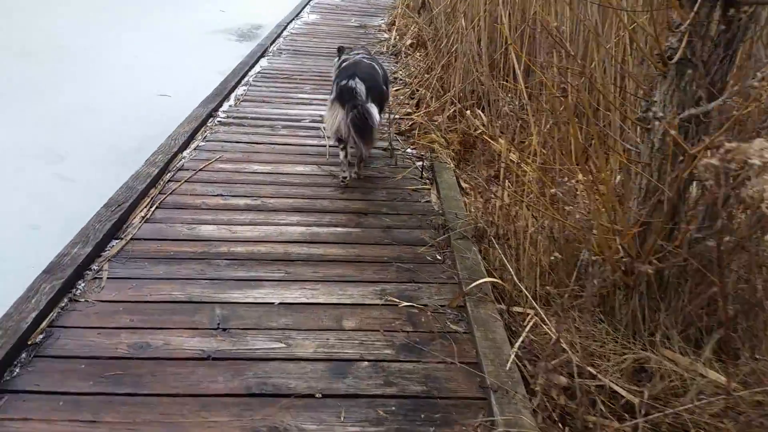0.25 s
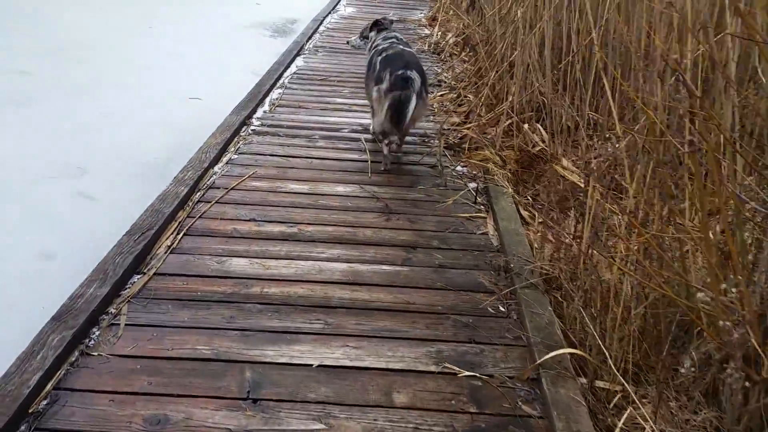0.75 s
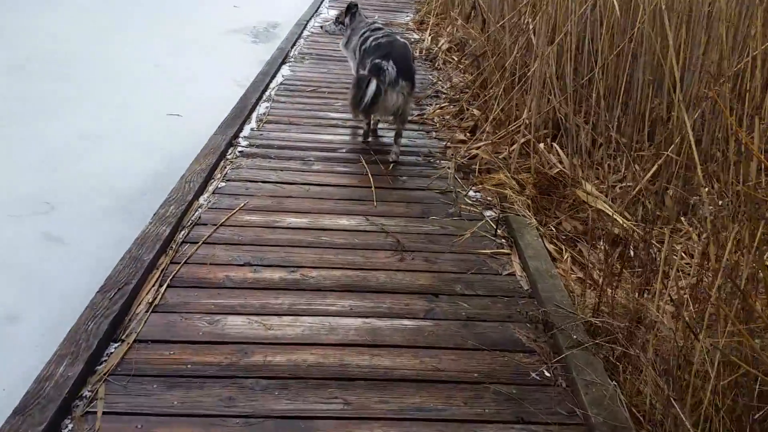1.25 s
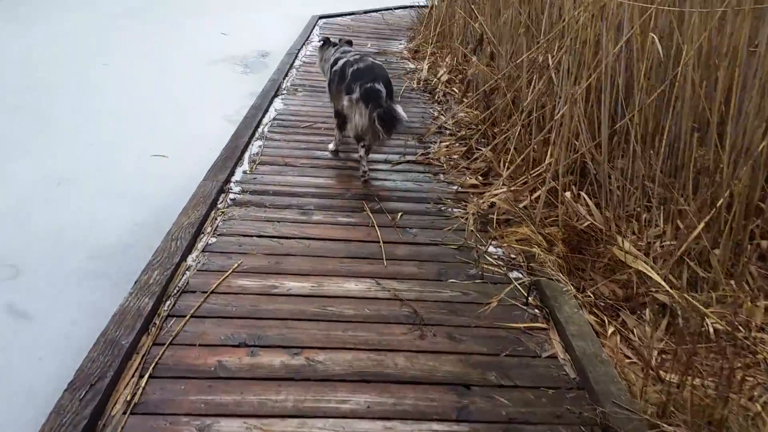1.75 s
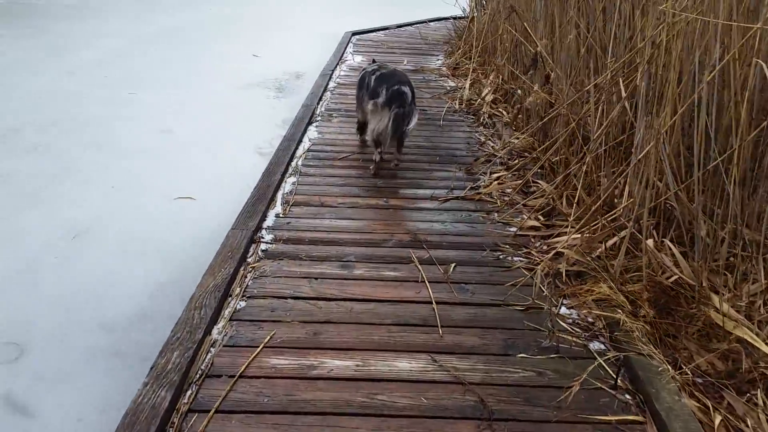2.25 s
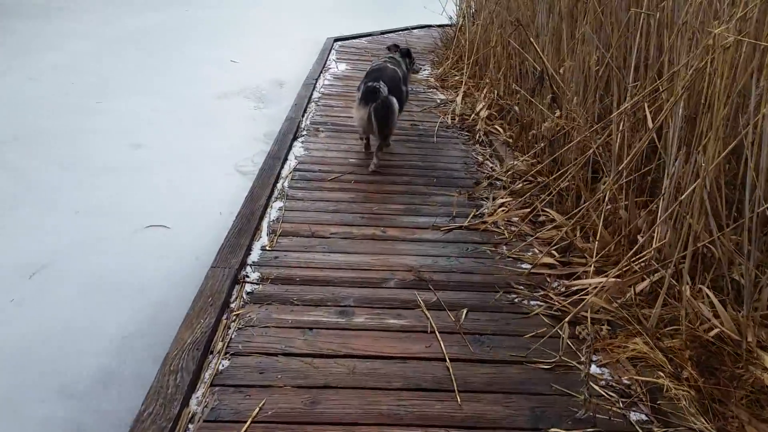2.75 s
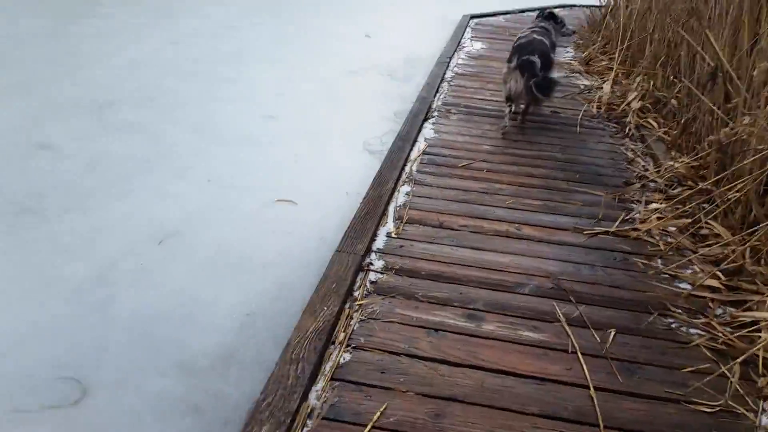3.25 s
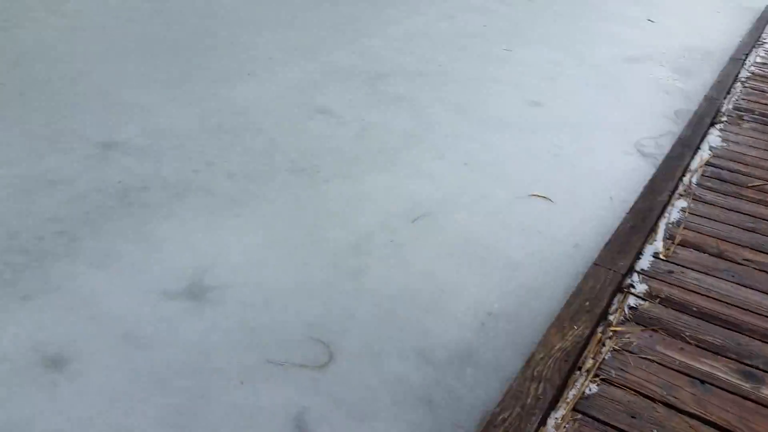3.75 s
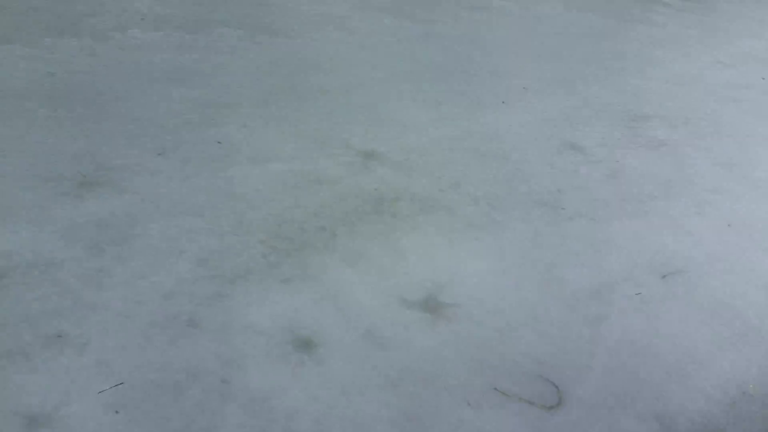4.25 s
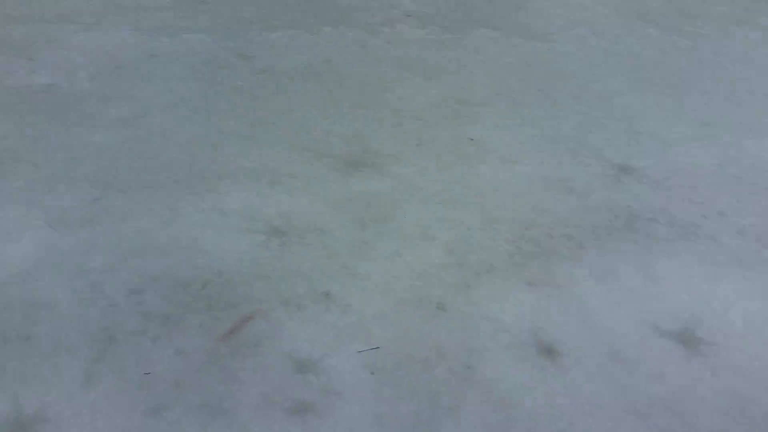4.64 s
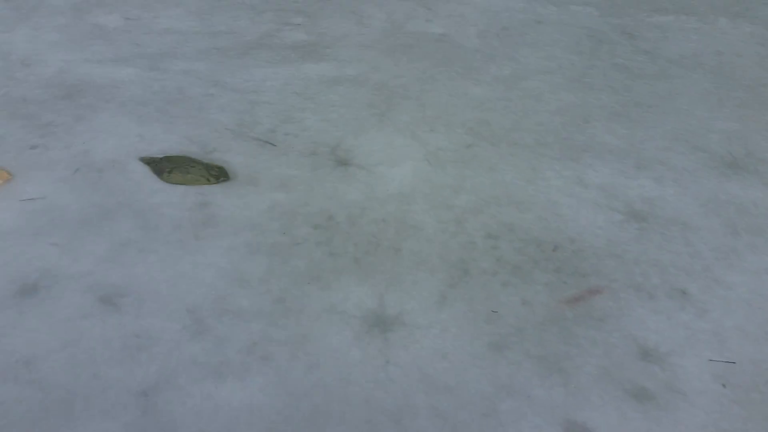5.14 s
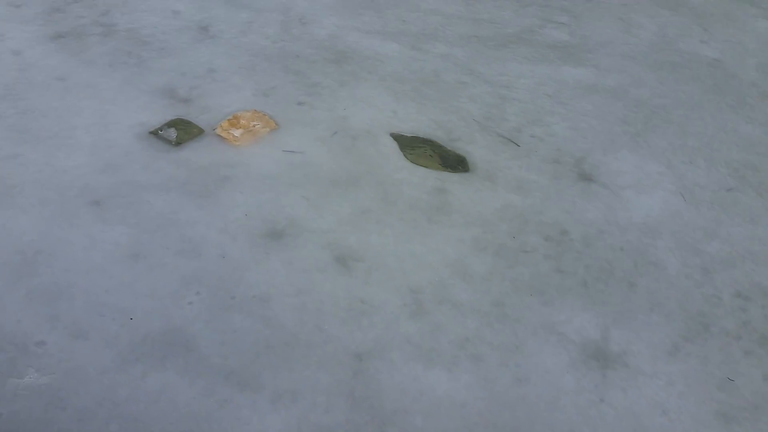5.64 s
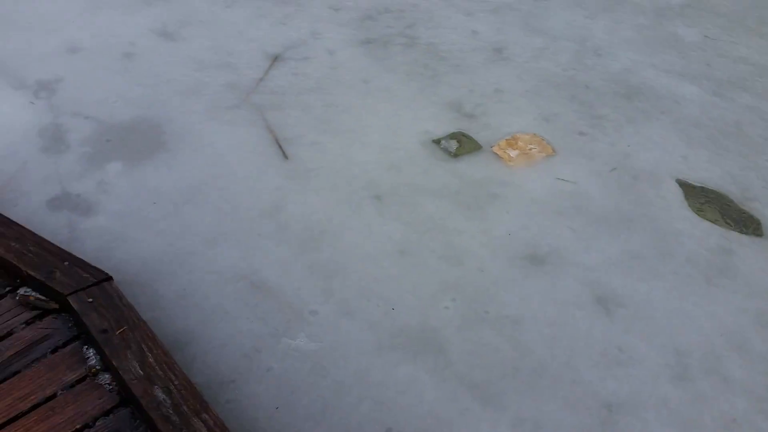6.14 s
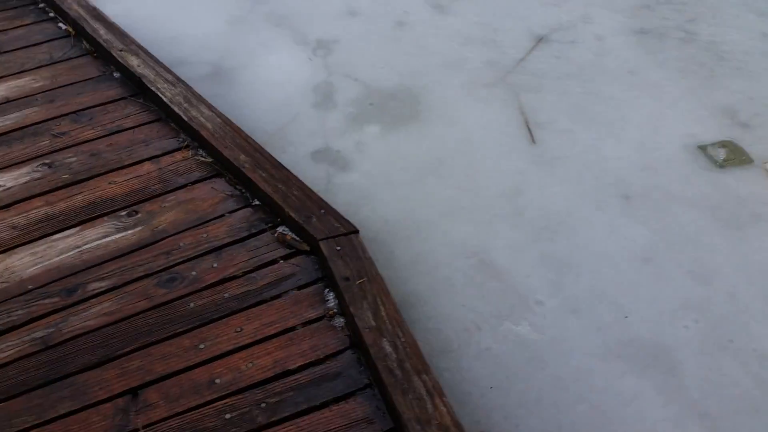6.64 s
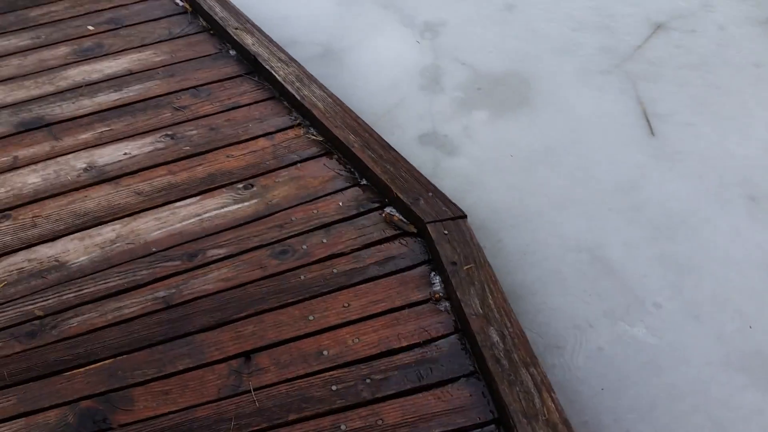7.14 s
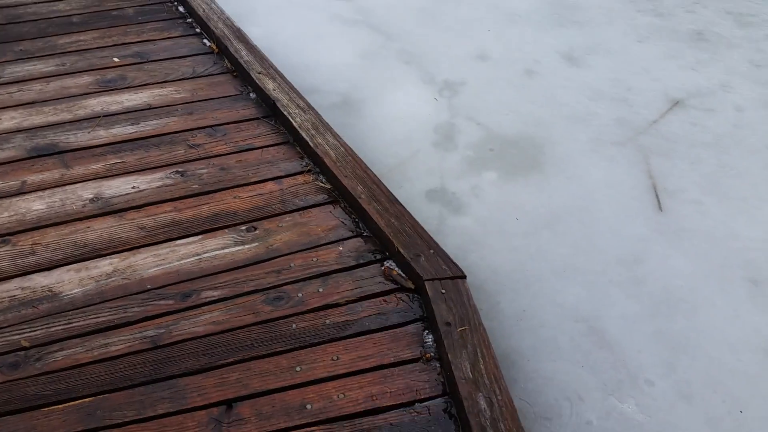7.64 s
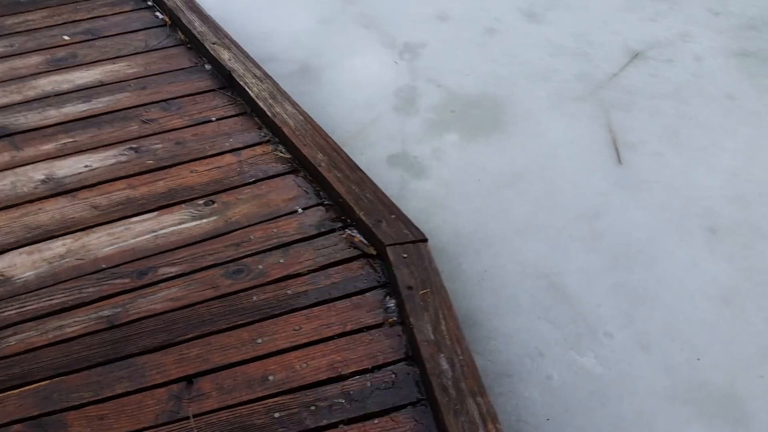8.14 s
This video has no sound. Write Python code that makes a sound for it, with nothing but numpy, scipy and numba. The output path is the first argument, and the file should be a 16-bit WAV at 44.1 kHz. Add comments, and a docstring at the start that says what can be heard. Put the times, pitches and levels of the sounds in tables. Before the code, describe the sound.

From 0 to 3 seconds, a dog walks softly on a wooden boardwalk: low, short, woody knocks in small groups near 0.2-0.4, 1.0-1.2, 1.7-2.0 and 2.7 seconds, with faint claw ticks and dry scuffs. Thin reeds rustle, air hisses quietly and wind rumbles low, with a small gust around 2. Near 3.1 a last couple of steps overlap a barely audible first lap. From 3.25 quick wet lapping runs close to the microphone, nearly five strokes a second, each a splashy slap with a hollow gulp and falling drops. It firms up around 4.3, eases slightly near 5.3, then grows stronger from 5.9. A low wind thump comes at 6.5. From 7 to 8.4 the laps are loudest, slightly slower and longer, with bright plops, a sharp click near 7.8, and richer fizz and slosh, continuing to the end.

```python
"""A dog trots over a boardwalk: boards knock as fading sine waves, while claws and paws add bursts of noise.
After about three seconds it laps water close by, nearly five laps a second, growing louder overall.
Each lap is made of bubble clouds: water drawn up, a dense spray, a hollow gulp, then drops falling back.
Plops, clicks and one low thump stand out, and the stirred water fizzes and sloshes between laps.
Throughout, dry reeds rustle and a little wind rumbles as filtered noise on the two ports of a microphone."""
import sys
import numpy as np
from scipy import signal
from scipy.fft import rfft, irfft
from scipy.io import wavfile
from numba import njit

SR = 44100
rng = np.random.default_rng(int(sys.argv[2]) if len(sys.argv) > 2 else 0)


def output_pcm(signal):
    """Save a mono or channel-first signal as 16-bit PCM at the path in sys.argv[1].

    Samples are clipped to [-1, 1] before scaling.
    """
    pcm = np.clip(np.atleast_2d(signal).T, -1, 1) * 32767
    wavfile.write(sys.argv[1], SR, np.round(pcm).astype(np.int16))


N = 370440  # length of the scene [samples]
TIME = np.arange(N) / SR  # [s]

# Strikes of the tongue: (middle [s], level before the trims of its parts [dB],
# length [s], extra brightness of the spray above 3 kHz [dB])
LAPS = [(3.068, -51.5, 0.042, 7), (3.253, -32, 0.014, -0.5), (3.466, -29.5, 0.013, 3),
        (3.684, -29.5, .014, -0.5), (3.892, -32.5, 0.025, -0.5), (4.098, -29.5, .017, 0),
        (4.306, -24, .019, 1.5), (4.519, -24.5, .018, -1), (4.73, -23.5, 0.02, -2.5),
        (4.934, -24.5, .018, 0.5), (5.141, -26, .022, 1.5), (5.332, -28, 0.019, 3.5), (5.526, -26, .025, 1),
        (5.717, -26, 0.023, 0), (5.923, -22, 0.022, -1), (6.136, -23, .021, 1), (6.368, -22, .018, -2),
        (6.591, -21, .018, -3.5), (6.825, -22, 0.021, -2), (7.058, -22, 0.028, 0),
        (7.287, -19.5, .023, -3.5), (7.542, -22.5, 0.032, 1.5), (7.786, -21, 0.039, -1),
        (8.02, -18, .034, -2), (8.271, -20, 0.036, -0.5)]
# Largest single bubbles, bright plops to low glugs; the 102 Hz row is a thump of wind or handling
# on the microphone: (start [s], level before a 1.5 dB cut [dB], pitch [Hz])
PLOPS = [(3.46, -19.5, 1930), (3.859, -29, 1410), (4.275, -23, 2260), (4.291, -19, 2780),
         (4.388, -27, 1860), (4.578, -20.5, 650), (4.716, -21, 1140), (4.751, -17, 954), (4.808, -20, 2090),
         (4.868, -25.5, 1280), (4.98, -31, 1410), (5.361, -21.5, 954), (5.551, -20.5, 902),
         (5.857, -24, 1500), (5.914, -13, 990), (6.068, -19.5, 1136), (6.101, -15, 2170),
         (6.333, -21, 1600), (6.364, -12, 1114), (6.514, -21, 102), (6.632, -15.5, 1130), (6.907, -20, 538),
         (7.04, -10, 2230), (7.271, -9, 1740), (7.433, -11, 1780), (7.445, -9.5, 1670),
         (7.524, -10.5, 1760), (7.678, -16, 1370), (7.77, -12.5, 1950), (7.971, -17.5, 876),
         (7.992, -11, 1480), (8.03, -18.5, 260), (8.064, -21, 146), (8.261, -8.5, 2010), (8.312, -29, 197)]
# Sharpest clicks of bursting films and landing drops: (start [s], level before a 5 dB cut [dB])
CLICKS = [(3.3013, -26.5), (4.4914, -21), (4.6587, -16.5), (4.7155, -14), (5.0752, -16.5), (5.488, -21),
          (5.889, -17), (6.1262, -9.5), (7.3396, -6.5), (7.7808, -0.5), (7.8285, -11)]
# Stirred water, before the trims below: (time [s], bubbling [dB], low slosh [dB])
WATER = [(3.0, -83, -65), (3.45, -54, -61), (3.98, -58.5, -64), (4.43, -45, -58), (4.79, -45.5, -55.5),
         (5.53, -54, -63), (6.22, -42.5, -51.5), (7.53, -38.5, -47), (8.4, -36, -37.5)]
# Colour of the spray: (frequency [Hz], gain [dB])
SPRAY_COLOUR = [(60, -39), (200, -8), (500, -17), (1000, 0), (1350, -7), (1900, -2.5), (2600, -4.5),
                (3800, -12.5), (5300, -10.5), (7500, -15.5), (11000, -16.5), (14000, -14.5), (16000, -22)]
# The hollow under the tongue, which colours the gulp: (frequency [Hz], gain [dB])
HOLLOW_COLOUR = [(60, -24), (150, -8), (260, 1), (400, -3), (700, 1.5), (2000, 11), (6000, -21)]
# Colour of the fine fizz: (frequency [Hz], gain [dB])
FIZZ_COLOUR = [(80, -54), (300, -49), (800, -1), (1400, -3), (2200, -5), (3700, -13), (5200, -11),
               (8000, -16.5), (11000, -20.5), (16000, -21.5)]
# Colour of the low slosh: (frequency [Hz], gain [dB])
SLOSH_COLOUR = [(60, -35), (130, 5), (260, -7), (450, -3), (700, -1), (1500, -30.5)]
# Steps on the boards: (start [s], peak of the knock [dB], board pitch [Hz])
STEPS = [(0.21, -25.5, 211), (0.271, -34, 199), (0.391, -33.5, 219), (0.99, -34.5, 234), (1.012, -37, 204),
         (1.113, -44, 245), (1.241, -36.5, 209), (1.732, -32.5, 246), (1.852, -41.5, 255),
         (1.983, -48, 468), (2.663, -48, 266), (3.078, -40, 247), (3.133, -30, 256)]
# Ways a board rings: (multiple of its pitch [ratio], level within the knock [dB], share of the fade time [ratio])
BOARD_MODES = [(1.001, 12.5, 1.16), (1.26, -39, 3.7), (2.2, -19, 1.05), (2.55, -9.5, 0.47),
               (3.4, -35, 0.35)]
# Claws on wood: (start [s], level before a 4 dB lift and colouring [dB], pitch [Hz])
TICKS = [(0.59, -48, 2170), (1.063, -48, 940), (1.1236, -41, 4600), (1.6213, -45.5, 2070),
         (1.663, -46.5, 3370), (1.924, -43.5, 1890), (2.195, -56, 2920), (3.039, -50, 3170),
         (3.0704, -40.5, 2480)]
# Colours of the shaking deck, a paw's contact and a claw's tick: (frequency [Hz], gain [dB])
DECK_COLOUR = [(80, -27), (170, -4), (270, 0), (450, -16.5), (1200, -31), (4000, -51)]
CONTACT_COLOUR = [(600, 12), (2000, 7), (4000, -6), (12000, -11)]
CLAW_COLOUR = [(500, 8.5), (4500, 0), (9000, -8), (16000, -9)]
# Scuffs of paws and dry reeds: (middle [s], level [dB], length [s])
SCUFFS = [(0.258, -58, 0.046), (0.739, -63, 0.014), (1.141, -53.5, .035), (1.636, -60, 0.018),
          (1.85, -61, .02), (2.219, -63, .03), (2.581, -62, 0.034), (2.78, -62, 0.019)]
# Colour of dry scraping: (frequency [Hz], gain [dB])
SCRAPE_COLOUR = [(200, -4), (800, 5.5), (1500, -7.5), (2900, -2), (4000, -10), (5000, -5), (8000, -7),
                 (16000, -12)]
# Colour of rustling reeds: (frequency [Hz], gain [dB])
RUSTLE_COLOUR = [(200, 0), (600, 0.5), (2000, -2.5), (3500, -7.5), (5000, -7), (9000, -12), (16000, -13)]
# Wind on the microphone, before gusts and left-right balance: (time [s], level [dB])
WIND = [(0.0, -60.5), (1.87, -62), (2.03, -48.5), (2.13, -58), (3.39, -61.5), (3.44, -54), (5.15, -53),
        (5.71, -56), (6.55, -42.5), (6.69, -49.5), (8.35, -52), (8.4, -51)]
# Colour of the wind rumble: (frequency [Hz], gain [dB])
RUMBLE_COLOUR = [(15, -51), (35, -12.5), (75, 1), (115, -7.5), (200, -18.5), (500, -30.5), (2000, -64)]
# Colour of the steady air noise: (frequency [Hz], gain [dB])
AIR_COLOUR = [(30, 8), (100, 5), (250, -6), (600, -14), (2000, -25), (4000, -29.5), (9000, -27.5),
              (16000, -26)]
# Colour of the reflections: (frequency [Hz], gain [dB])
REFLECTION_COLOUR = [(250, -7), (1200, -0.5), (8000, 2.5), (16000, -7)]
# How the two ports differ: (frequency [Hz], left minus right [dB])
PORTS = [(200, -2), (600, -0.5), (1000, -4.5), (1600, -7), (2300, -6), (3000, 2.5), (3800, 4), (5000, -3.5),
         (6000, -5), (7200, 2), (10500, 4), (13500, -3.5), (16000, 1.5)]

# Room for one lap or scuff [samples], and where its middle lies in there [s]
LAP_SIZE, LAP_MID_S = 16384, 0.14
# Parts of a strike against its level [dB]
SPRAY_DB, FROTH_DB, GULP_DB, MIST_DB = -0.5, -7.5, -10.5, -15
# Water drawn up, water falling back and bursting films, against the bubbling of the water [dB]
DRAW_DB, FALL_DB, FILM_DB = 3, -1, 15.5
# The tongue leaves the water this long before it strikes, give or take the spread, and a film bursts [s]
FILM_LEAD_S, FILM_SPREAD_S = 0.06, 0.018
# Time for a 1 kHz plop to fade by 60 dB [s], and the power of pitch that makes lower ones ring longer
PLOP_T60_S, PLOP_RING_LAW = 0.025, -0.41
CLICK_HZ = 5300
BOARD_T60_S = 0.064  # fade by 60 dB, before each mode's share
REEDS_DB = -71.5  # steady rustle, before flutter and crackle
WIND_APART = 0.85  # left-right difference against the shared part
TOP_HZ = 16100  # upper limit of the sound


def lapping():
    """Laps, each led by a bursting film, plus the plops, low thump and clicks that stand out of them."""
    out = np.zeros((2, N))
    bubbling = curve(WATER)
    chances = rng.standard_normal((len(LAPS), 3))
    for (s, db, length, bright_db), (early, strength, pitch) in zip(LAPS, chances):
        water_db = bubbling[int(s * SR)]
        add(out, s - LAP_MID_S, lap(db, length, bright_db, water_db))
        film = click(water_db + FILM_DB + 1.3 * strength, 3700 * 2 ** (0.3 * pitch))
        add(out, s - FILM_LEAD_S + FILM_SPREAD_S * early, film)

    s, db, hz = np.transpose(PLOPS)
    t60 = PLOP_T60_S * (hz / 1000) ** PLOP_RING_LAW
    lag = rng.normal(0, 0.00006, len(s))
    plops = ring(N, s, hz, t60, undb(db - 1.5), 0.064, lag, 0.25)
    out += reflect(plops, db=-5, t60=0.04)

    for s, db in CLICKS:
        add(out, s, click(db - 5, CLICK_HZ))
    return out


def lap(db, length, bright_db, water_db, ragged_db=3.5, cup_db=2.0):
    """One stroke: ringing bubbles for water drawn up, struck, gulped and dropped; stirred water splashes more."""
    draw = bubbles(LAP_SIZE, *flock(-0.071, 0.023, 1590, 0.388, 0.0, count=16),
                   cycles=23.0, scatter_db=6.5, glide=0.53, swell=0.59)
    spray = bubbles(LAP_SIZE, *flock(-0.00101, 0.36 * length, 5710, 0.93, 0.0, count=400),
                    cycles=7, scatter_db=4, glide=0.064, swell=0.087)
    # the tongue cups the water differently each time, which shifts the colour
    cupped = [(hz, level + bright_db * (hz > 3000) + cup_db * rng.standard_normal())
              for hz, level in SPRAY_COLOUR]
    spray = colour(spray, cupped)
    spray = spray * undb(ragged_db * walk(257.6)[:LAP_SIZE])  # the film tears in spurts
    froth = bubbles(LAP_SIZE, *flock(0.001003, 0.5 * length, 1690, 0.425, 0.146, count=50),
                    cycles=13.6, scatter_db=1.5, glide=0.11, swell=0.3)
    gulp = bubbles(LAP_SIZE, *flock(0.01, 0.6 * length, 432, 0.49, 0.33, count=44),
                   cycles=3.7, scatter_db=4.0, glide=0.081, swell=0.64)
    drops = bubbles(LAP_SIZE, *flock(0.063, 0.025, 1106, 0.498, 0.12, count=20),
                    cycles=9.0, scatter_db=4.0, glide=0.19, swell=0.95)
    mist = bubbles(LAP_SIZE, *flock(0.0022, 0.022, 4360, 1.0, 0.12, count=260),
                   cycles=21, scatter_db=7, glide=0.11, swell=1.0)

    parts = [(spray, SPRAY_DB), (froth, FROTH_DB),
             (colour(gulp, HOLLOW_COLOUR), GULP_DB), (colour(mist, FIZZ_COLOUR), MIST_DB)]
    strike = sum(hold(part, db + part_db, length) for part, part_db in parts)
    drawn = hold(draw, water_db + DRAW_DB, 0.048)
    falling = hold(drops, water_db + FALL_DB, 0.085)
    # the head moves, so every lap meets the boards differently
    return reflect(strike + drawn + falling, db=-9, t60=0.041)


def click(db, hz):
    """A film bursts or a drop lands: a very short burst of noise, strongest around one pitch."""
    return crack(db, hz, t60=0.012, ring_db=8, swell_s=0.00075)


def stirred_water(count=5000, calm_db=-4, fizz_db=-1.0, slosh_db=0.5):
    """Scattered bubbles keep fizzing and sloshing; the fizz is calmest midway between laps."""
    first_s = WATER[0][0]
    start = rng.uniform(first_s, N / SR, count)
    fizz = bubbles(N, start, 4600 * 2 ** rng.normal(0, 1.0, count),
                   cycles=34, scatter_db=4, glide=0.3, swell=0.82)
    # the finest bubbles merge into a wash
    wash = undb(-2 + 2 * walk(70)) * noise(FIZZ_COLOUR, apart=0.9)
    fizz = unit(colour(fizz, FIZZ_COLOUR)) + wash

    swirl = rng.uniform(first_s, N / SR, count // 6)
    slosh = bubbles(N, swirl, 400 * 2 ** rng.normal(0, 0.732, len(swirl)),
                    cycles=9.0, scatter_db=4.5, glide=0.25, swell=0.99)

    # one full turn from each strike to the next
    phase = 2 * np.pi * np.interp(TIME, np.array(LAPS)[:, 0], np.arange(len(LAPS)))
    fizz = fizz * undb(curve(WATER, axis=1) + fizz_db + calm_db * (1 - np.cos(phase)) / 2)
    # the slosh swells after each strike and dies down before the next
    slosh_level = curve(WATER, axis=2) + slosh_db + 4.8 * np.sin(phase)
    slosh = unit(colour(slosh, SLOSH_COLOUR)) * undb(slosh_level)
    fade_in = np.clip((TIME - first_s) / 0.1, 0, 1)
    return fade_in * (fizz + slosh)


def boardwalk(push_s=0.003, sag=0.038, sag_s=0.014, contact_db=-17, deck_db=-20, deck_t60_s=0.2):
    """Soft steps ring the boards as fading sines and shake the deck around them; claws tick on the wood."""
    out = np.zeros((2, N))
    t = TIME[:SR // 3]
    for s, db, hz in STEPS:
        # the pitch sags as weight comes onto the board
        turns = hz * (t + sag * sag_s * (1 - np.exp(-t / sag_s)))
        knock = 0
        for ratio, level, share in BOARD_MODES:
            fade = undb(level - 60 * t / (BOARD_T60_S * share))
            knock = knock + fade * np.sin(2 * np.pi * turns * ratio)
        knock = knock * (1 - np.exp(-(t / push_s) ** 2))  # soft start
        add(out, s, undb(db) * knock / np.abs(knock).max())

        shudder = rng.standard_normal((1, len(t))) * undb(-60 * t / deck_t60_s)
        add(out, s, hold(colour(shudder, DECK_COLOUR), db + deck_db, 0.026))
        contact = crack(db + contact_db, 930, t60=0.024, ring_db=-5.5, swell_s=0.00061)
        add(out, s, colour(contact, CONTACT_COLOUR))

    for s, db, hz in TICKS:
        tick = crack(db + 4.0, hz, t60=0.02, ring_db=11, swell_s=0.00032)
        add(out, s, colour(tick, CLAW_COLOUR))
    return out


def reeds(count=6000, flutter_db=3.0):
    """Noise and tiny short rings make dry reeds rustle; each scuff is a swell of scratchy grains."""
    start = rng.uniform(0, N / SR, count)
    crackle = bubbles(N, start, 4500 * 2 ** rng.normal(0, 0.96, count),
                      cycles=2.5, scatter_db=4.5, glide=0.0, swell=0.1)
    rustle = noise(RUSTLE_COLOUR, apart=1.0) + undb(-8.0) * unit(colour(crackle, RUSTLE_COLOUR))
    out = rustle * undb(REEDS_DB + flutter_db * walk(60))
    for s, db, length in SCUFFS:
        grains = bubbles(LAP_SIZE, *flock(0, 0.54 * length, 3360, 0.95, 0, count=45),
                         cycles=7.8, scatter_db=6.5, glide=0.0, swell=0.11)
        add(out, s - LAP_MID_S, hold(colour(grains, SCRAPE_COLOUR), db, length))
    return out


def outdoors(gust_db=1.5, left_db=1.5):
    """Steady air noise, and gusts of low noise on the ports, stronger on the left one."""
    gust_level = curve(WIND) + gust_db + 1.9 * walk(37)
    gusts = noise(RUMBLE_COLOUR, apart=WIND_APART) * undb(gust_level)
    air = undb(-59) * noise(AIR_COLOUR, apart=0.56)
    return gusts * undb([[left_db], [-left_db]]) + air


def bubbles(size, start, hz, cycles, scatter_db, glide, swell, lag_s=0.00013):
    """A cloud of ringing bubbles of uneven strength, fade time and lag between the ports."""
    strength, life, lag = rng.standard_normal((len(start), 3)).T
    hz = np.clip(hz, 80, SR / 3)
    t60 = cycles * np.exp(0.65 * life) / hz
    loudness = undb(scatter_db * np.minimum(strength, 2.4)) / np.sqrt(t60)
    return ring(size, start, hz, t60, loudness, glide, lag * lag_s, float(swell))


def flock(middle_s, spread_s, hz, spread_octaves, fall, count):
    """Times and pitches around one moment of a lap; most crowd the middle, and fall makes later ones lower."""
    late, pitch = rng.standard_normal((count, 2)).T
    start = LAP_MID_S + middle_s + spread_s * (late + 0.05 * late ** 2 + 0.04 * late ** 3)
    return start, hz * 2 ** (spread_octaves * pitch - fall * late)


@njit
def ring(out_size, start, hz, t60, size, glide, lag, swell):
    """Fading sines with a soft start and a pitch rise set by glide; each reaches the two ports with its own lag."""
    out = np.zeros((2, out_size))
    for k in range(len(start)):
        for c in range(2):
            begin = start[k] + (c - 0.5) * lag[k]
            first = max(int(begin * SR) + 1, 0)
            last = min(int((begin + t60[k]) * SR), out_size)
            for i in range(first, last):
                t = i / SR - begin
                age, turns = t / t60[k], hz[k] * t
                envelope = (1 - np.exp(-turns / swell)) * np.exp(-6.9 * age)  # 6.9 gives a 60 dB fade
                out[c, i] += size[k] * envelope * np.sin(2 * np.pi * turns * (1 + glide * age / 2))
    return out


def crack(db, hz, t60, ring_db, swell_s):
    """A short burst of noise, shaped around hz and scaled to a peak of db."""
    t = TIME[:SR // 8]
    envelope = undb(-60 * t / t60) * (1 - np.exp(-(t / swell_s) ** 2))
    burst = rng.standard_normal((2, len(t))) * envelope
    burst = colour(burst, [(hz / 20, -22), (hz / 3, -3), (hz / 1.47, 0),
                           (hz, ring_db), (hz * 1.31, -1), (hz * 3, -10)])
    return undb(db) * burst / np.abs(burst).max()


def reflect(x, db, t60):
    """Add a fading cluster of random reflections, weak in the bass."""
    t = TIME[:SR // 4]
    tail = rng.standard_normal((2, len(t))) * (t > 0.0006) * undb(-60 * t / t60)
    response = colour(hold(tail, db, 1 / SR), REFLECTION_COLOUR)
    return x + signal.oaconvolve(x, response, axes=1)[:, :x.shape[1]]


def noise(points, apart):
    """Coloured stereo noise of average strength (rms) 1; apart sets how much the sides differ."""
    mid, side = rng.standard_normal((2, N))
    return unit(colour(np.array([mid + apart * side, mid - apart * side]), points))


def colour(x, points):
    """Filter through (Hz, dB) points without sounding ahead of time, using the cepstrum."""
    hz, db = np.transpose(points)
    size = 4096
    f = np.maximum(np.arange(size // 2 + 1) * SR / size, 1)
    gain = undb(np.interp(np.log(f), np.log(hz), db))
    cepstrum = irfft(np.log(gain))[:size // 2]
    cepstrum[1:] *= 2  # put all of the response after its start
    response = irfft(np.exp(rfft(cepstrum, size)))[:size // 2]
    return signal.oaconvolve(x, response[None], axes=1)[:, :x.shape[1]]


def walk(rate):
    """Random values, rate per second, joined by straight lines to make a wavering level."""
    knots = rng.standard_normal(1024)
    return np.interp(TIME * rate, np.arange(len(knots)), knots)


def hold(x, db, seconds):
    """Give x the total energy of a stereo sound that stays at db for so many seconds."""
    return x * undb(db) * np.sqrt(2 * SR * seconds / np.sum(x ** 2))


def undb(db):
    """Turn decibels into a gain."""
    return 10 ** (np.asarray(db) / 20)


def unit(x):
    """Scale to an average strength (rms) of 1."""
    return x / np.sqrt(np.mean(x ** 2))


def curve(table, axis=1):
    """Draw straight lines through one column of a table, giving a value at every sample."""
    return np.interp(TIME, np.array(table)[:, 0], np.array(table)[:, axis])


def add(out, s, x):
    """Mix x into out from time s [s] on."""
    i = max(int(s * SR), 0)
    out[:, i:i + x.shape[-1]] += x[..., :max(N - i, 0)]


def scene():
    """The dog at the water, with a faint tail of reflections from the reeds, then boardwalk, reeds and wind."""
    water = reflect(lapping() + stirred_water(), db=-15.0, t60=0.08)
    return water + boardwalk() + reeds() + outdoors()


def record(dry):
    """Each microphone port has its own colour; a steep filter cuts the top."""
    left = colour(dry[:1], [(hz, db / 2) for hz, db in PORTS])
    right = colour(dry[1:], [(hz, -db / 2) for hz, db in PORTS])
    low_pass = signal.ellip(10, 0.2, 70, TOP_HZ, fs=SR, output="sos")
    return signal.sosfilt(low_pass, np.vstack([left, right]))


dry = scene()
out = record(dry)
output_pcm(out)
```